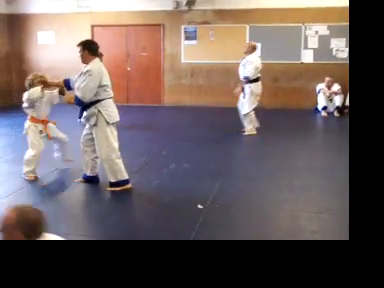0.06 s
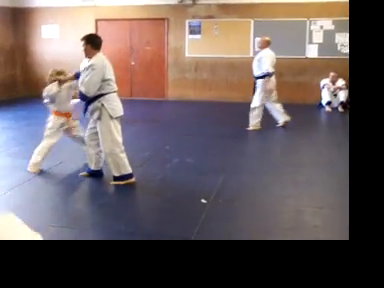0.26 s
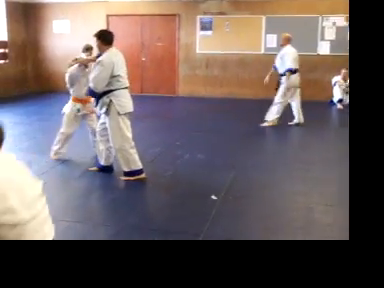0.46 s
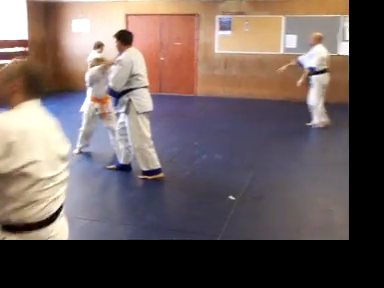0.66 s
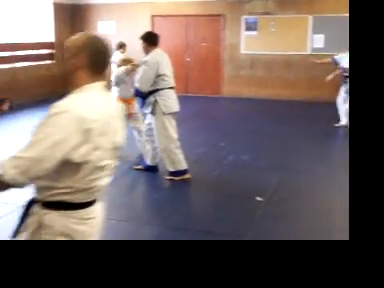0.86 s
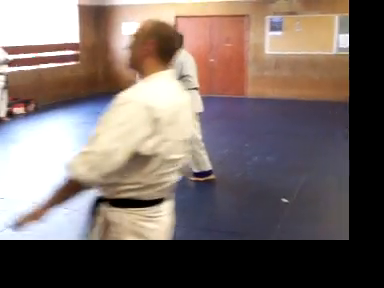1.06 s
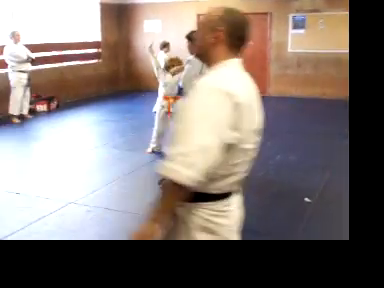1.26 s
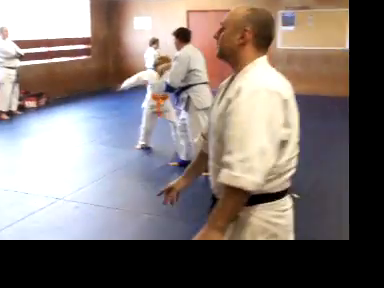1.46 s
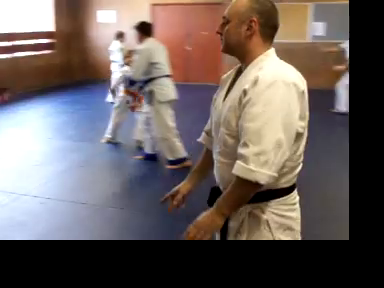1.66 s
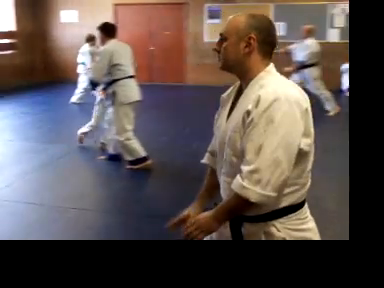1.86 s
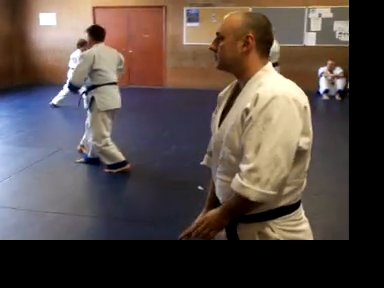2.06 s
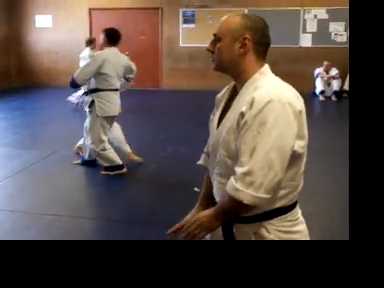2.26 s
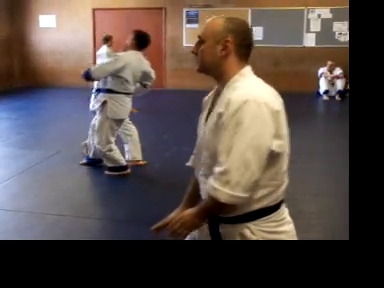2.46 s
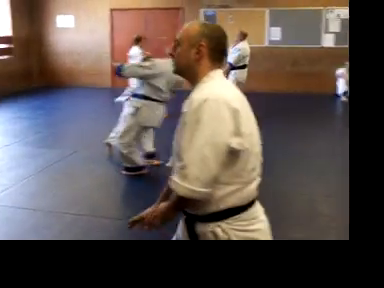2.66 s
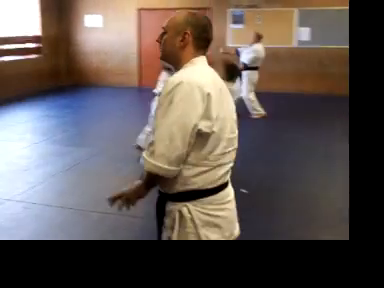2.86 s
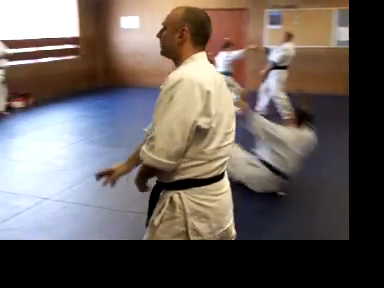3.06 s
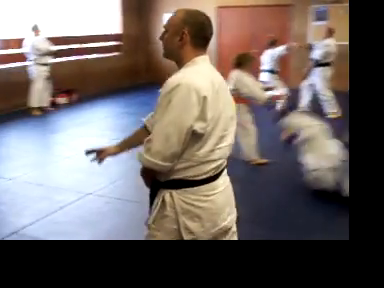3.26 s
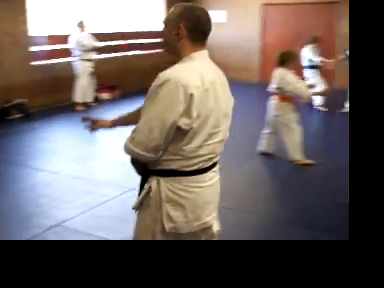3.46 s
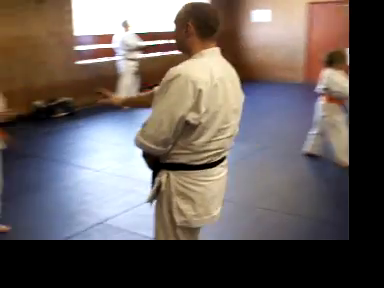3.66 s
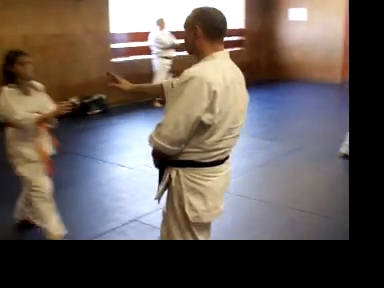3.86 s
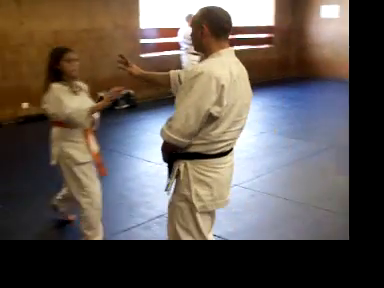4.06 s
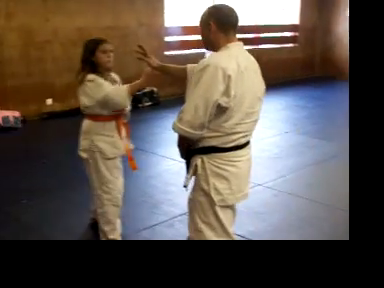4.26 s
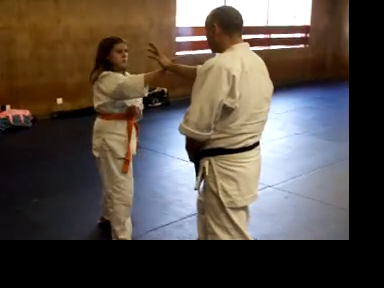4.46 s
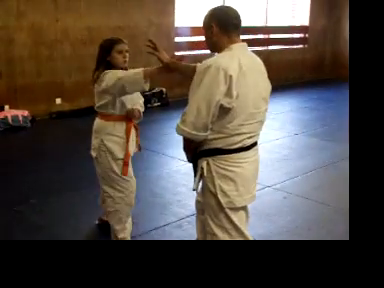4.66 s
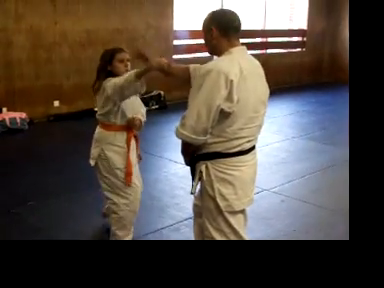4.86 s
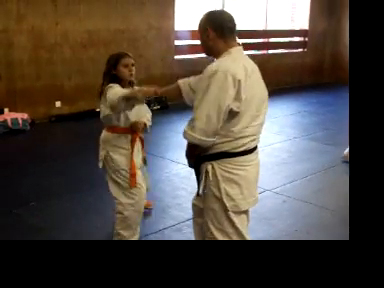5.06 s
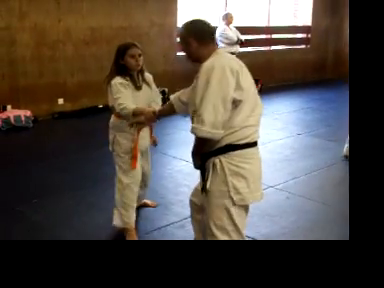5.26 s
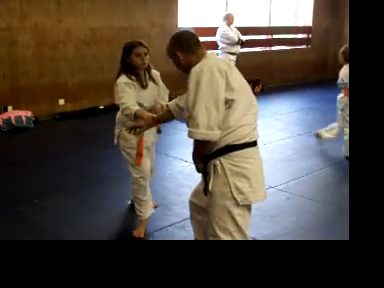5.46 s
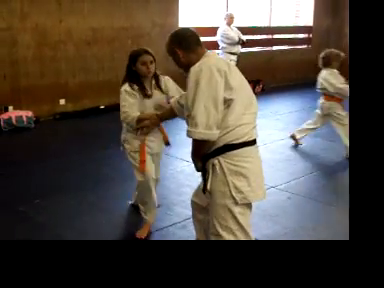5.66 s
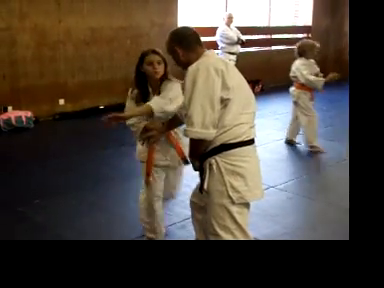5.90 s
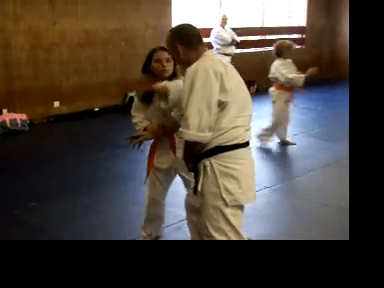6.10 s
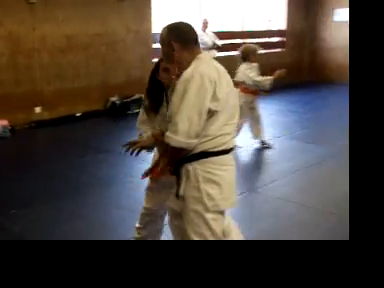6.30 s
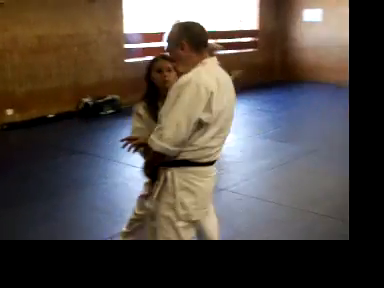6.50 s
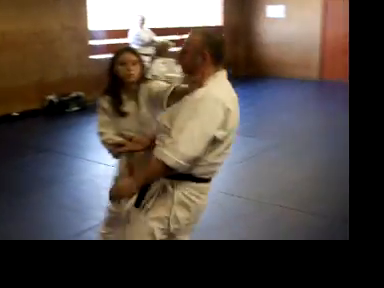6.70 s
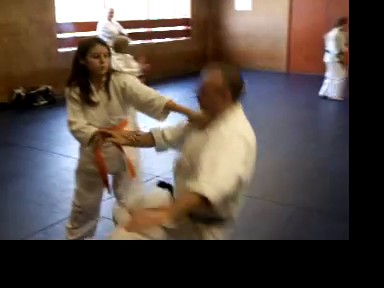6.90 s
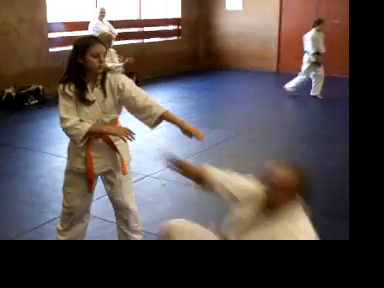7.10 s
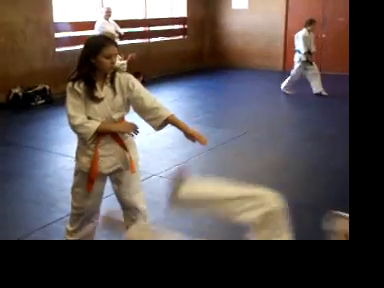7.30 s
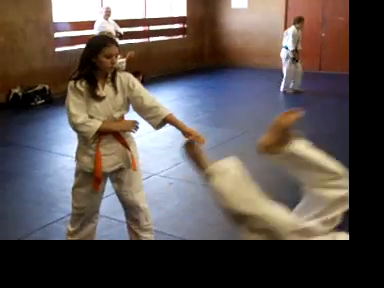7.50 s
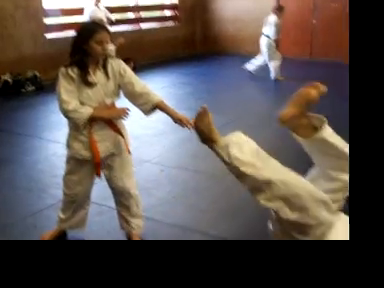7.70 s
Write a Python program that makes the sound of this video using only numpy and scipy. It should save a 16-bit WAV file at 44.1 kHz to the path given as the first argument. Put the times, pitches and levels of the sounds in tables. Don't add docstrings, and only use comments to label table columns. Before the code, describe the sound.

Dense dry scuffing of bare feet and cotton on vinyl mats, with hard overloaded slap-thuds at about 3.2, 5.1 and 7.2 seconds.

```python
import sys
import numpy as np
from scipy import signal
from scipy.io import wavfile

SR = 44100
rng = np.random.default_rng(int(sys.argv[2]) if len(sys.argv) > 2 else 0)


def transcribe(signal):
    frames = np.atleast_2d(signal).T
    limited = np.clip(frames, -1, 1)
    pcm = np.round(limited * 32767).astype(np.int16)
    wavfile.write(sys.argv[1], SR, pcm)


def decibels_to_gain(level_db):
    exponent = np.asarray(level_db, float) / 20
    return 10 ** exponent


N = 341334

# start_s, boom_db, hardness_db (knock re boom), scuff_db (dull contact re boom)
LOADS = [(0.039, -47.5, 1, 3), (0.532, -48.5, 1, -10), (0.851, -59, 15, 17), (1.188, -48, 5, -12),
         (1.62, -48.5, 1.5, 3), (1.778, -45, -26, -12), (2.254, -51, -11, 9), (2.437, -58.5, 7, 22.5),
         (2.9, -43.5, 2, 9), (3.0, -34.5, -3, 5.5), (3.132, -31.5, 1, -2.5), (3.317, -38, 6, 2),
         (3.479, -39, -6.5, -23), (3.687, -39.5, -19, -22), (3.89, -38, 0.5, 1.5), (4.582, -44, -17, 3.5),
         (4.893, -49.5, 9, 16.5), (4.946, -33, -3, -0.5), (5.057, -29.5, -1.5, -8), (5.205, -30.5, -8, -11),
         (5.365, -32.5, -19, -29), (5.547, -34.5, -15, -25), (6.124, -44, -0.5, 2), (6.666, -45.5, 0.5, 1),
         (6.834, -40.5, 1.5, 5), (7.0, -35, 5, 7.5), (7.246, -33, 1.5, 0.5), (7.166, -27.5, -4.5, -9),
         (7.361, -30, -29, -24), (7.545, -32, -25, -6)]


def rms_one(x):
    return x / np.sqrt(np.mean(x ** 2) + 1e-20)


def at_hz(points, hz):
    table_hz, table_db = np.transpose(points)
    return np.interp(np.log(hz), np.log(table_hz), table_db)


def band(x, low_hz, high_hz):
    return signal.sosfilt(signal.butter(2, [low_hz, high_hz], "band", fs=SR, output="sos"), x)


def resonate(x, modes):
    out = 0
    for k, (hz, width_hz, level_db) in enumerate(modes):
        r = np.exp(-np.pi * width_hz / SR)
        poles = [1, -2 * r * np.cos(2 * np.pi * hz / SR), r * r]
        out = out + (-1) ** k * decibels_to_gain(level_db) * signal.lfilter([1 - r, 0, r - 1], poles, x)
    return rms_one(out)


def drift(rate_hz):
    r = np.exp(-40 * np.pi * rate_hz / SR)
    slow = signal.lfilter([1], [1, -2 * r, r * r], rng.standard_normal(N // 20 + 4002))[4000:]
    return np.interp(np.arange(N) / 20, np.arange(len(slow)), rms_one(slow))


def moments():
    return np.arange(0, N + 200, 200)[:, None] / SR


def every_sample(slow):
    return np.interp(np.arange(N) / SR, moments()[:, 0], slow)


def swells(middle_s, half_s):
    return np.exp(-((moments() - middle_s) / half_s) ** 2)


def total_db(rest_db, shapes, event_db):
    power = decibels_to_gain(2 * rest_db) + shapes @ decibels_to_gain(2 * event_db)
    return every_sample(10 * np.log10(power))


def bursts(rows):
    out, t = np.zeros(N + SR), np.arange(-SR // 4, SR // 4) / SR
    for s, half_s, peak_db, hz in rows:
        swing = np.cos(2 * np.pi * hz * t) * np.exp(-(t / half_s) ** 2)
        out[round(s * SR) - SR // 4:][:len(t)] -= decibels_to_gain(peak_db) * swing
    return out[:N]


def sag_db():
    # start_s, depth_db, deepest_after_s
    sags = [
        (3.194, 2.5, 0.44),
        (3.909, -0.5, 0.2),
        (5.1, 3.5, 0.33),
        (1.3, 2, 0.15),
        (5.9, 1.5, 0.13),
        (7.19, 3.5, 0.27),
    ]
    start_s, depth_db, deepest_s = np.transpose(sags)
    phase = np.maximum(np.arange(N)[:, None] / SR - start_s, 0) / deepest_s
    return -(phase * np.exp(1 - phase)) ** 2 @ depth_db


def flinch_db():
    # start_s, depth_db
    flinches = [
        (3.211, 10),
        (3.917, 0.5),
        (5.0788, 9),
        (7.066, 5.5),
        (7.2036, 11.5),
    ]
    recovery_s = 0.013
    start_s, depth_db = np.transpose(flinches)
    since_s = np.arange(N)[:, None] / SR - start_s
    return -((since_s > 0) * np.exp(-np.abs(since_s) / recovery_s)) @ depth_db


def friction():
    # middle_s, half_s, hiss_db, edge_db
    # (dry edge over 6.5 kHz re hiss)
    strides = [(0.079, 0.19, -23.5, -7), (0.253, 0.03, -24.5, -15.5), (0.291, 0.017, -22, -5.5),
               (0.418, 0.064, -24, -9), (0.555, 0.14, -23.5, -8), (0.831, 0.048, -23, -8),
               (0.952, 0.18, -27.5, -9), (1.037, 0.0036, -24.5, -4.5), (1.051, 0.008, -22, -6),
               (1.59, 0.027, -33.5, -9.5), (4.261, 0.026, -34.5, -9.5), (1.135, 0.064, -23.5, -6.5),
               (1.265, 0.031, -24.5, -5), (1.443, 0.15, -28, -10), (1.705, 0.12, -22, -7),
               (1.979, 0.057, -23, -6), (2.05, 0.06, -29, -8), (2.222, 0.04, -25.5, -10.5),
               (2.303, 0.033, -24, -7), (2.477, 0.14, -24.5, -8.5), (2.932, 0.096, -26, -7.5),
               (3.108, 0.102, -26, -4.5), (4.168, 0.059, -25.5, -8.5), (4.656, 0.077, -25.5, -8),
               (4.89, 0.093, -32, -2.5), (5.172, 0.18, -21.5, -11), (5.775, 0.072, -22, -11),
               (6.244, 0.12, -27.5, -8.5), (6.341, 0.046, -23.5, -3.5), (6.44, 0.03, -24, -11),
               (6.558, 0.099, -23.5, -11), (6.901, 0.099, -27.5, -9.5), (7.142, 0.03, -23, -8.5),
               (7.123, .006, -23.5, -12.5), (4.965, 0.032, -30, -9.5), (3.27, .05, -27, -9),
               (5.33, .05, -28, -10), (7.35, .06, -28.5, -9),
               (0.356, 0.011, -21.5, -6.5), (2.414, 0.0069, -27, -5.5), (4.001, .03, -32, -10.5),
              (4.582, .015, -34.5, 2.5), (5.715, 0.005, -24, -9.5), (6.338, .006, -26, -4),
              (6.347, .005, -25.5, -4), (6.546, .018, -24.5, -5), (6.843, 0.019, -27, -4),
              (6.91, 0.0094, -21.5, -12), (7.264, 0.0099, -25, -12.5)]
    # start_s, length_s, hiss_db, drag_db (under 3 kHz re hiss), edge_db (re hiss)
    rolls = [
        (3.132, 0.32, -22, -4, -9.5),
        (3.486, 0.37, -25, -3.5, -14),
        (3.862, 0.13, -23, -7, -10),
        (5.141, 0.47, -23, -7.5, -22),
        (5.516, 0.47, -27.5, -8.5, -8.5),
        (6.927, 0.15, -23, -6, -9),
        (7.13, 0.24, -20.5, -8.5, -14),
        (7.429, 0.4, -24, -8.5, -10.5),
    ]
    # start_s, length_s, hiss_db, drag_db (re hiss), edge_db (re hiss)
    topples = [
        (2.927, 0.2, -34.5, 5, -12.5),
        (4.878, 0.13, -31.5, 1.5, -12.5),
        (6.602, 0.16, -32, -1, -13),
    ]
    rise_s, fade_s = 0.13, 0.07
    stride_drag_db = -9.5
    far_hiss_db, far_drag_db, far_edge_db = -32.5, -37, -45.5
    middle_s, half_s, stride_db, stride_edge_db = np.transpose(strides)
    start_s, length_s, roll_db, roll_drag_db, roll_edge_db = np.transpose(rolls + topples)
    since_s = moments() - start_s
    fade = np.exp(-np.maximum(since_s - length_s, 0) / fade_s)
    roll_shapes = np.clip(since_s / rise_s, 0, 1) ** 2 * fade
    shapes = np.hstack([swells(middle_s, half_s), roll_shapes])
    level_db = np.r_[stride_db, roll_db]
    relative_drag_db = np.r_[stride_drag_db + 0 * middle_s, roll_drag_db]
    relative_edge_db = np.r_[stride_edge_db, roll_edge_db]
    hiss_db = total_db(far_hiss_db, shapes, level_db)
    drag_db = total_db(far_drag_db, shapes, level_db + relative_drag_db)
    edge_db = total_db(far_edge_db, shapes, level_db + relative_edge_db)
    return hiss_db, drag_db - hiss_db, edge_db - hiss_db


def sliding():
    # hz, level_db (per Hz)
    slide_colour = [(1300, -26), (1450, -6.5), (1650, -9), (2030, -9), (2840, -3.5), (4500, 0.6), (5500, 1),
                    (6400, 0), (7100, 0.5), (7500, 2.5), (7900, 0.5)]
    # middle_s, half_s, squeak_hz, width_octaves, lift_db
    squeaks = [(0.334, 0.083, 6200, 0.26, 5), (0.82, 0.06, 5900, 0.36, 3.5), (0.92, 0.06, 5340, 0.15, 3),
               (1.052, 0.01, 4600, 0.11, 9), (5.01, 0.033, 2300, 0.24, 3.5), (3.05, .03, 1900, .5, 4),
               (1.1, 0.01, 4530, 0.11, 0.5), (1.14, 0.11, 4570, 0.12, 5.5),
               (1.712, 0.051, 3760, 0.21, -0.5), (2.206, 0.03, 3320, 0.17, 4.5),
               (2.537, 0.2, 5450, 0.14, 6), (3.41, 0.23, 4310, 0.28, 6), (3.77, 0.17, 4210, 0.24, 5.5),
               (3.61, 0.36, 2110, .25, 5.5), (5.18, 0.17, 5220, 0.22, 3), (5.46, 0.36, 3310, 0.25, 4.5),
               (6.4, 0.096, 5050, 0.17, 1.5), (7.297, .08, 5400, 0.25, -2), (7.5, 0.41, 2300, 0.51, 6.5)]
    hiss_db, drag_db, edge_db = friction()
    slips_per_s = 9000
    slip_db = 4.56 * np.minimum(rng.exponential(1, (2, N)), 5)
    slips = (rng.random((2, N)) < slips_per_s / SR) * decibels_to_gain(slip_db)
    grains = rng.standard_normal((2, N)) * (2.6 + slips)
    flutter = drift(33)
    middle_s, half_s, squeak_hz, octaves, lift_db = np.transpose(squeaks)
    stride = swells(middle_s, half_s)
    edges_hz, out = np.geomspace(1200, 8200, 18), 0
    for k, (low_hz, high_hz) in enumerate(zip(edges_hz, edges_hz[1:])):
        hz = np.sqrt(low_hz * high_hz)
        heavy = np.interp(hz, [2600, 3700], [1, 0])
        dry_edge = np.interp(hz, [5800, 7200], [0, 1])
        tilt_db = heavy * (drag_db + 8.5) + dry_edge * (edge_db + 5.5)
        squeak_db = stride @ (lift_db * np.exp(-(np.log2(hz / squeak_hz) / octaves) ** 2))
        flicker_db = 0.75 * flutter + every_sample(squeak_db)
        gain = decibels_to_gain(at_hz(slide_colour, hz) + tilt_db + flicker_db)
        out = out + gain * band(grains[k % 2], low_hz, high_hz)
    return decibels_to_gain(hiss_db + 1.5) * rms_one(out)


def hall_air():
    # hz, level_db (per Hz)
    air_colour = [(82, -32), (140, 1.5), (198, -9.5), (232, -2.5), (728, -3), (798, -3), (1140, 1),
                  (1280, -18), (2200, -1), (2860, -36), (4840, -120)]
    # hz, width_hz, level_db
    vent_modes = [(1086, 190, 5), (1467, 190, 4)]
    # time_s, whistle_db
    draught = [(0.0, -45), (0.86, -40), (1.7, -32.5), (2.22, -27.5), (2.91, -30.5), (3.32, -23.5),
               (3.8, -34.5), (4.15, -48), (4.85, -31.5), (5.45, -54), (5.75, -33), (6.14, -39), (6.7, -29),
               (7.3, -38), (7.74, -30.5)]
    low_air_sag, high_air_sag = 1.5, 0.36
    air_db = -39.5
    sag = sag_db()
    vent_s, whistle_db = np.transpose(draught)
    vent_db = np.interp(np.arange(N) / SR, vent_s, whistle_db)
    white = rng.standard_normal((3, N))
    edges_hz, out = np.geomspace(140, 2400, 10), 0
    for k, (low_hz, high_hz) in enumerate(zip(edges_hz, edges_hz[1:])):
        hz = np.sqrt(low_hz * high_hz)
        sinks = np.interp(hz, [620, 850], [low_air_sag, high_air_sag])
        out = out + decibels_to_gain(at_hz(air_colour, hz) + sinks * sag) * band(white[k % 2], low_hz, high_hz)
    whistle = resonate(resonate(white[2], vent_modes), vent_modes)
    return decibels_to_gain(air_db + 2.5) * rms_one(out) + decibels_to_gain(vent_db - 9.5) * whistle


def loading(rest_db, relative_db, t60_s):
    rise_s = 0.082
    start_s, boom_db = np.transpose(LOADS)[:2]
    since_s = moments() - start_s
    decay_db = -120 * np.maximum(since_s - rise_s, 0) / t60_s
    shapes = np.clip(since_s / rise_s, 0, 1) ** 2 * decibels_to_gain(decay_db)
    return total_db(rest_db, shapes, boom_db + relative_db)


def floor_boom():
    # hz, width_hz, level_db
    floor_modes = [(82.5, 12, -13.5), (100.2, 12, -10.5)]
    # hz, width_hz, level_db
    panel_modes = [(125.8, 24, -1.5), (160, 13, -2.5), (180, 32, -7)]
    # hz, width_hz, level_db
    knock_modes = [(224.4, 13, 8), (272, 63, -3), (329.3, 22, -0.5)]
    hard_db, scuff_db = np.transpose(LOADS)[2:]
    panel_relative_db = 3 + 0.47 * hard_db
    shake, sag = rng.standard_normal((4, N)), sag_db()
    boom_db = loading(-52.5, 0, t60_s=1)
    panel_db = loading(-50, panel_relative_db, t60_s=0.9)
    knock_db = loading(-56, hard_db, t60_s=0.78) + sag
    contact_db = loading(-48.5, scuff_db, t60_s=0.99) + sag
    boom = decibels_to_gain(boom_db) * resonate(band(shake[0], 81, 160), floor_modes)
    panels = decibels_to_gain(panel_db) * resonate(band(shake[1], 107, 187), panel_modes)
    knock = decibels_to_gain(knock_db) * resonate(band(shake[2], 200, 400), knock_modes)
    contact = decibels_to_gain(contact_db) * rms_one(band(shake[3], 300, 770))
    return boom + panels + knock + contact


def hands():
    # middle_s, half_s, rumble_db
    jolts = [(0.19, 0.039, -39), (2.744, 0.031, -43), (3.078, 0.048, -32), (3.197, 0.036, -38.5),
             (3.948, 0.084, -33), (4.223, 0.4, -41), (5.03, 0.049, -33.5), (5.388, 0.059, -41),
             (5.822, 0.13, -38), (6.935, 0.016, -34), (7.129, 0.13, -35), (7.42, 0.077, -34),
             (7.717, 0.17, -35.5)]
    still_db = -45.5
    middle_s, half_s, jolt_db = np.transpose(jolts)
    rumble = rms_one(band(band(rng.standard_normal(N), 21, 68), 36, 120))
    return decibels_to_gain(total_db(still_db, swells(middle_s, half_s), jolt_db)) * rumble


def snaps():
    # time_s, peak_db
    creases = [(0.15, -17), (0.197, -13.0), (0.257, -13), (0.3, -9), (0.462, -11.0), (0.5972, -14),
               (0.6072, -15), (0.6407, -7), (1.053, -9.5), (1.15, -11), (1.2426, -15), (1.2558, -11.0),
               (1.2847, -9.5), (1.4733, -14), (1.766, -17), (1.946, -15), (2.1853, -14), (2.3825, -15.0),
               (2.406, -10), (2.5476, -11), (2.888, -6), (2.9471, -13), (3.0168, -7), (3.0339, -11),
               (3.0549, -12), (3.0765, -6), (3.1493, -9), (3.1757, -13.0), (3.2798, -5), (3.368, -9),
               (3.4121, -11), (3.596, -11.0), (3.614, -16), (3.6292, -12.0), (3.666, -12), (3.875, -9),
               (3.9774, -10), (4.0155, -13), (4.4377, -11), (4.5496, -21), (5.132, -10.0), (5.2826, -9),
               (5.3093, -6), (5.7158, -5.5), (5.9117, -17), (6.0091, -17.0), (6.0592, -23), (6.1356, -13),
               (6.293, -12.5), (6.3374, -13.5), (6.3553, -9.5), (6.554, -15.5), (6.563, -11), (6.9071, -10),
               (6.912, -14), (7.1213, -10.0), (7.429, -10), (7.4934, -13.0)]
    low_hz, high_hz = 900, 7600
    s, peak_db = np.transpose(creases)
    clicks = np.full(N, 1e-18)
    clicks[np.round(s * SR).astype(int)] = decibels_to_gain(peak_db) * rng.choice([-1, 1], len(s))
    unit_peak = np.abs(band(np.eye(1, 64)[0], low_hz, high_hz)).max()
    return band(clicks, low_hz, high_hz) / unit_peak


def floor_rings():
    # middle_s, half_s, peak_db, hz
    rings = [(0.985, 0.017, -37, 130), (1.285, .025, -38, 215), (1.39, .015, -34, 72),
             (4.42, 0.027, -42, 170), (4.77, 0.021, -38, 450), (5.5, 0.017, -32, 140),
             (5.54, 0.018, -39, 180), (5.65, .025, -32, 135), (5.71, 0.017, -28, 95),
             (5.72, 0.027, -42, 502), (6.25, .025, -35, 156), (6.41, 0.044, -41, 214),
             (6.51, 0.026, -40, 171), (6.57, .02, -38, 150), (6.775, .02, -33, 135),
             (6.94, 0.018, -32, 64.6), (7.52, .025, -31, 135), (3.27, .025, -32, 217),
             (3.33, .015, -24.5, 105), (3.37, .02, -31, 180), (3.415, 0.016, -31, 130),
             (3.46, .015, -34.5, 290), (3.575, 0.014, -32, 100), (5.108, .01, -24, 150),
             (5.136, .01, -20, 120), (5.163, .01, -20.5, 156), (5.212, .012, -19.5, 139),
             (5.233, 0.011, -21, 190), (5.255, 0.011, -22.5, 140), (3.934, 0.011, -30.5, 420),
             (7.088, .004, -24, 270), (7.099, 0.0044, -21, 260), (7.214, 0.0043, -17.5, 250),
             (7.135, .01, -32, 620)]
    return bursts(rings)


def ticks():
    # time_s, peak_db
    catches = [(1.2358, -6), (1.309, -5.5), (2.403, -11.5), (3.228, -11), (3.2382, -5), (3.245, -5),
               (3.901, -12), (3.9137, -6), (3.9162, -4.5), (3.9105, -4.5), (4.4854, -13.5), (4.542, -14),
               (5.761, -15), (6.9838, -5.5), (7.0274, -5), (3.231, -6.5), (3.9028, -9), (3.9052, -11.5),
               (5.0937, -15), (5.118, -14), (7.059, -5), (7.0775, -13), (7.2282, -8)]
    out, t = np.zeros(N), np.arange(SR // 40) / SR
    for s, peak_db in catches:
        tick = band(rng.standard_normal(len(t)) * np.exp(-t / 0.0003), 2500, 8000)
        out[round(s * SR):][:len(t)] += decibels_to_gain(peak_db) * tick / np.abs(tick).max()
    return out


def gusts():
    # trough_s, half_s, peak_db, hz
    flaps = [
        (2.948, .08, -28, 14.7),
        (3.083, .09, -26, 14.5),
        (3.08, .012, -30, 25),
        (4.965, .02, -31, 16),
        (5.034, .036, -20, 17),
    ]
    return bursts(flaps)


def thuds():
    # start_s, peak_db, mat_hz, t60_s
    landings = [(3.1938, 4, 235, .035), (3.1968, -5, 700, .015), (3.2005, -5, 128, .065),
                (7.1902, 0, 340, .022), (5.0585, -5, 62, .05), (5.105, -19, 205, .2), (5.205, -21, 215, .2),
                (3.932, -15, 130, .08), (3.9405, -17, 240, .05), (3.961, -17, 105, .07),
                (5.0635, -6, 140, .11), (5.066, -6, 320, .03), (7.0628, -12, 450, .03),
                (7.064, -16, 95, .08), (7.192, -10, 165, .07), (3.295, -21, 112, .2), (3.44, -19, 130, .12),
                (7.284, -13, 88, .2), (3.072, -21, 420, .15), (5.285, -24, 165, .1), (7.197, -9, 105, .14),
                (4.03, -24, 220, .1), (7.285, -21, 340, .08), (3.035, -21, 650, .08),
                (3.198, -6, 1050, .015), (5.0665, -12, 900, .02), (7.0633, -6, 3300, .01),
                (7.065, -18, 1900, .012), (7.2035, -11, 2400, .012)]
    mat_low_cut_hz = 52
    out, t = np.zeros(N), np.arange(SR // 2) / SR
    for s, peak_db, hz, t60_s in landings:
        at = round(s * SR)
        swing = np.sin(2 * np.pi * hz * t) * decibels_to_gain(peak_db - 60 * t / t60_s)
        out[at:at + len(t)] += swing[:N - at]
    return signal.sosfilt(signal.butter(2, mat_low_cut_hz, "high", fs=SR, output="sos"), out)


def bumps():
    # middle_s, half_s, peak_db, hz
    more_rebounds = [(3.065, 0.0057, -19.5, 149), (3.07, 0.024, -27, 250), (3.24, 0.013, -25, 296),
                     (3.3, 0.041, -27.5, 205), (3.39, 0.039, -33, 195), (3.91, 0.0095, -30, 497),
                     (3.923, 0.0069, -27, 120), (3.995, 0.013, -22.5, 78), (4.032, 0.015, -28, 130),
                     (5.015, 0.019, -28, 473), (5.204, .012, -18.5, 200), (5.312, 0.014, -21, 160),
                     (5.37, 0.023, -33, 175), (5.443, 0.018, -23, 106), (5.51, 0.021, -27, 108),
                     (5.59, 0.025, -27, 110), (7.09, 0.025, -28.5, 434), (7.112, .012, -25, 72),
                     (7.248, .012, -23, 115), (7.262, 0.027, -27, 340), (7.265, 0.022, -33, 534),
                     (7.335, .03, -32, 222), (7.36, .03, -34, 345), (7.458, .022, -18.5, 97.5),
                     (7.56, 0.021, -27, 112), (7.603, .015, -22, 90.5), (7.705, 0.017, -27, 86)]
    return bursts(more_rebounds)


def slaps():
    slap_s = [3.1941, 3.2003, 3.2037, 3.2113, 3.9092, 5.0648, 5.069, 5.0715, 5.0785, 5.0862, 5.1095]
    last_slap_s = [7.063, 7.066, 7.187, 7.1902, 7.194, 7.2032, 7.2127, 7.2225]
    # level_db (rms), length_ms, bright_db, pocket_hz (trapped air)
    puffs = [(1.5, 3.2, 3.5, 4600), (-1.5, 2.1, 5, 5400), (0, 2.4, -1.5, 3400), (0, 1.4, -2.5, 4900),
             (-12.5, 4, 6.5, 5200), (2, 2.7, 5, 5200), (-7.5, 2.3, -4, 2600), (-3.5, 2.2, 0, 3800),
             (-11.5, 3.4, 9, 6300), (-10.5, 1.8, 13, 5000), (-21.5, 4, 15, 4700), (-6.5, 2.6, 2.5, 8400),
             (-15, 3.8, 11, 11000), (-9.5, 0.83, 7, 4600), (0, 4.7, 0.5, 4200), (-8, 3.2, 11, 3500),
             (-7.5, 2.1, 4, 8200), (-12.5, 1.4, 5.5, 5200), (-20, 1, 3, 4500)]
    spread = 1.5
    out, t = np.zeros(N), np.arange(SR // 40) / SR
    for s, (level_db, length_ms, bright_db, pocket_hz) in zip(slap_s + last_slap_s, puffs):
        air = rng.standard_normal(len(t))
        body = rms_one(band(air, 500, 3400))
        pocket = rms_one(band(air, pocket_hz / spread, min(pocket_hz * spread, 7600)))
        colour = rms_one(body + decibels_to_gain(bright_db) * pocket)
        attack = np.minimum(t / 0.000055, 1)
        shape = attack * np.exp(-(t * 1000 / max(length_ms, 0.5)) ** 3)
        out[round(s * SR):][:len(t)] += decibels_to_gain(level_db) * colour * shape
    return out


def scene():
    steady = decibels_to_gain(flinch_db()) * (sliding() + hall_air())
    light = snaps() + floor_rings() + ticks()
    bodies = floor_boom() + hands() + gusts() + thuds() + bumps() + slaps()
    mono = steady + light + bodies
    return np.array([mono, mono])


def roll_off(x):
    return signal.sosfilt(signal.butter(12, 9100, fs=SR, output="sos"), x)


def record(dry):
    recorder_sr, stretch_hz, top_cut_hz = 16000, 7700, 9280
    overload, hold = 0.66, 0.73
    low_rate = signal.resample_poly(dry[0], 160, 441)
    clipped = low_rate / (1 + np.abs(low_rate / overload) ** 8) ** (1 / 8)
    smooth = signal.firwin(24 * 441 + 1, stretch_hz, window=("kaiser", 9), fs=recorder_sr * 441)
    stretched = signal.resample_poly(clipped, 441, 160, window=smooth)[:N]
    held = stretched / (1 + np.abs(stretched / hold) ** 10) ** (1 / 10)
    held = signal.sosfilt(signal.cheby2(14, 32, top_cut_hz, fs=SR, output="sos"), held)
    return roll_off(np.array([held, held]))


dry = scene()
out = record(dry)
transcribe(out)
```